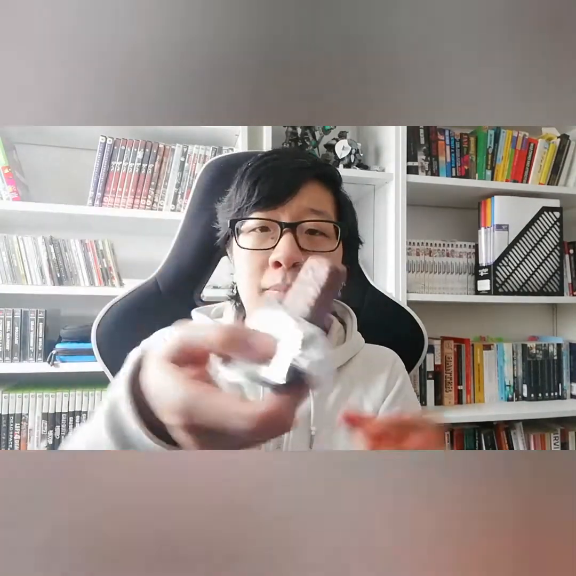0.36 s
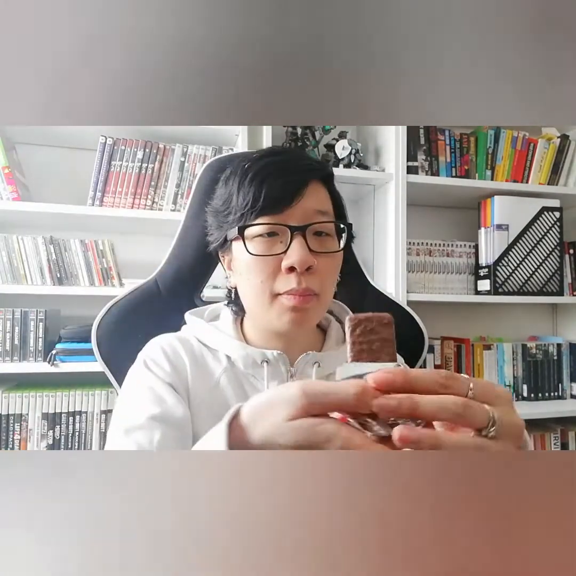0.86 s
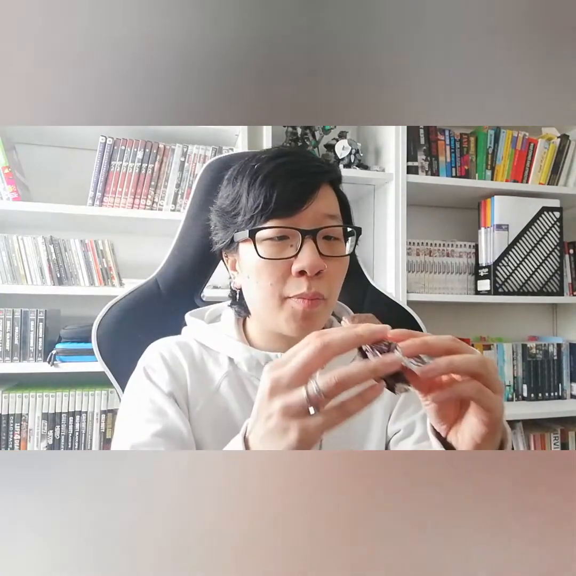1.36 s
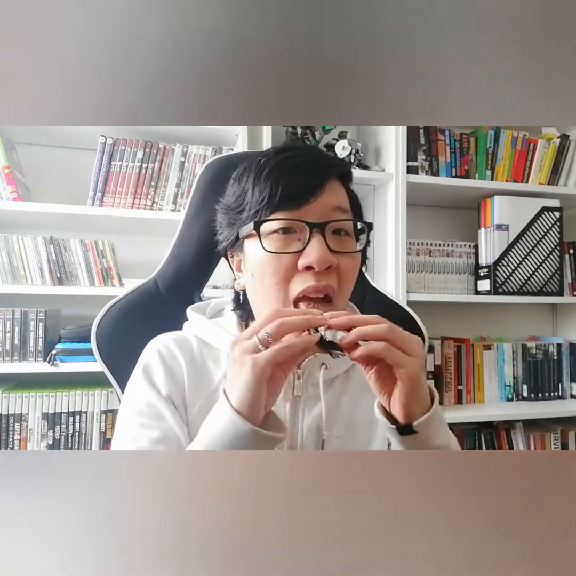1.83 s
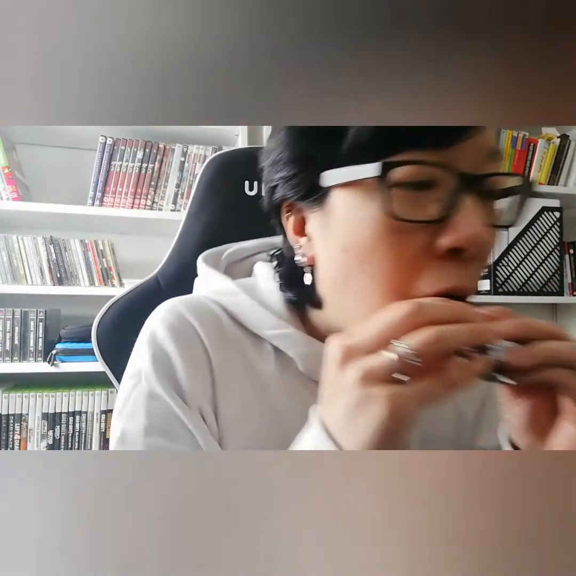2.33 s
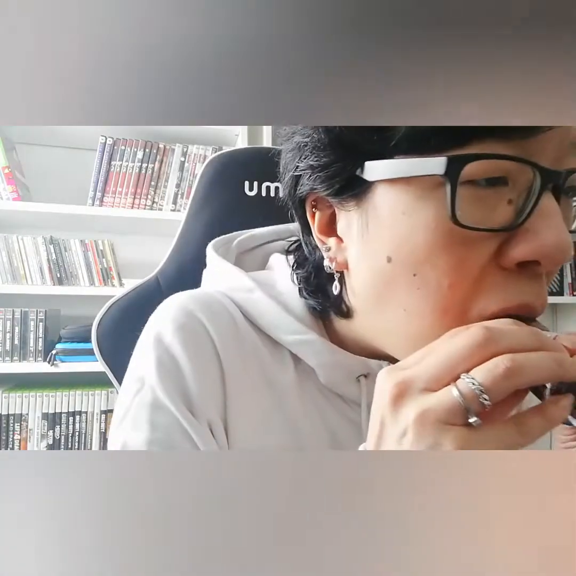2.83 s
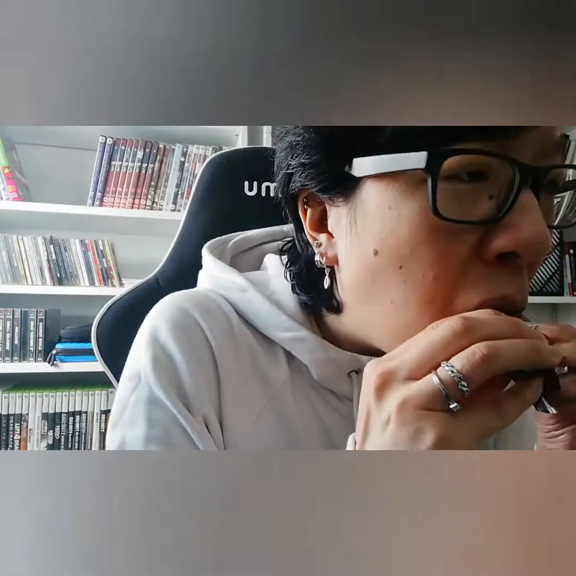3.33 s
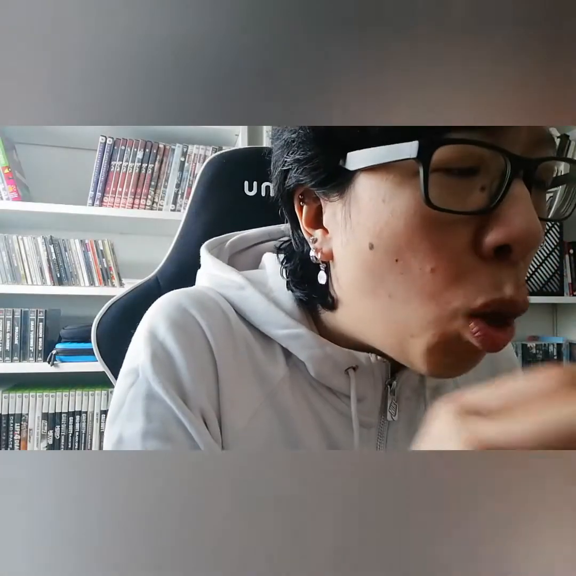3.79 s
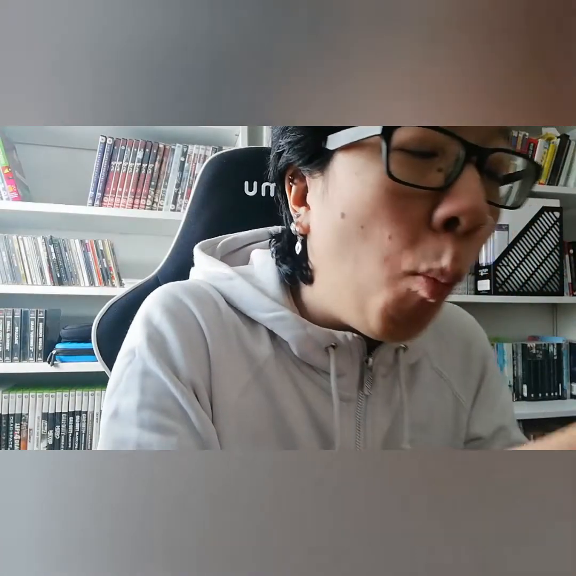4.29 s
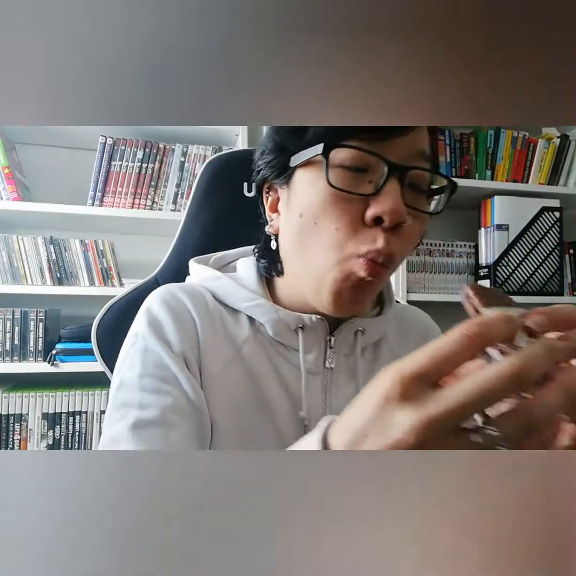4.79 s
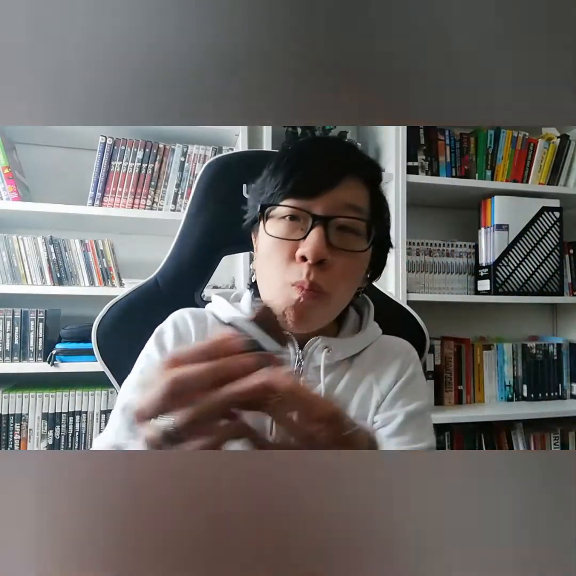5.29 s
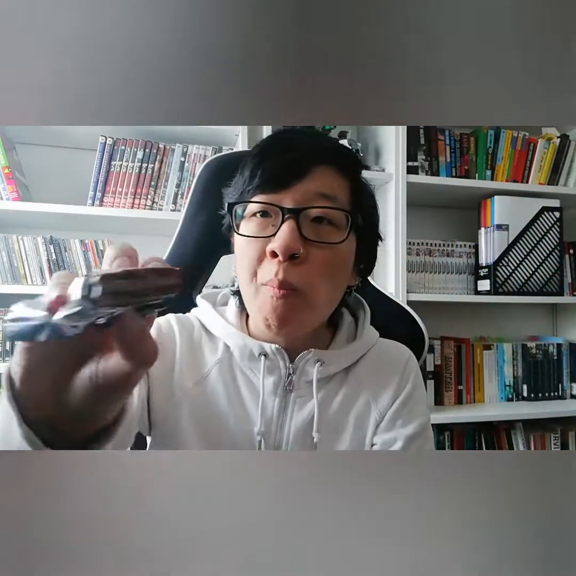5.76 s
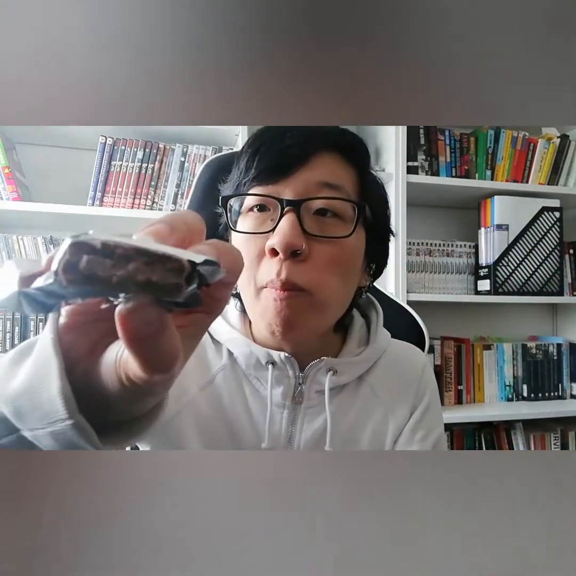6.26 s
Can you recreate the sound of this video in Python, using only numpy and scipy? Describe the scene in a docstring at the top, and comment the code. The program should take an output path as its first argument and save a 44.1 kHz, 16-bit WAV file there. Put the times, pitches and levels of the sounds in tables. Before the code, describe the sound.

Crisp, dry film crackles very near, each crease letting go with a bright tick. The handling comes in bursts: dense at first, scattered ticks next, then a single biscuit crunch with a low knock, a tangle of crinkles, a brief lull and another strong flurry. Hands rub softly and fingers tap dully. A quiet room with short reflections, faint hiss, deep drone and hum surrounds it.

```python
"""Biscuit wrapper handled in a small room

A thin plastic wrapper is handled close to a pair of spaced microphones: creases buckle in sharp snaps
over a finer crackle, each a burst of noise shaped by resonances. A bite drives damped modes with blows,
and fingers tap as decaying tones. Hands and sleeves rustle low down as shaped noise; a faint background
of noise and a hum lies beneath, and echoes with a diffuse tail place the near sounds in a furnished room.
"""
import sys
import numpy as np
from scipy import signal
from scipy.fft import rfft, irfft, next_fast_len
from scipy.io import wavfile
from scipy.ndimage import map_coordinates

SR = 44100
rng = np.random.default_rng(int(sys.argv[2]) if len(sys.argv) > 2 else 0)


def generate_wav(sig):
    """Save sig (samples, or channels by samples) to the path in sys.argv[1] as 16-bit PCM at SR."""
    pcm = np.round(np.clip(np.atleast_2d(sig).T, -1, 1) * 32767).astype(np.int16)
    wavfile.write(sys.argv[1], SR, pcm)


def attenuation_scalar(level_db):
    """Turn a level in dB into a linear amplitude multiplier (20 dB per decade)."""
    decades = np.asarray(level_db, float) / 20
    return 10 ** decades


N = 281856


def unit(x):
    """Normalization: scale to an rms of 1."""
    return x / np.sqrt(np.mean(x ** 2) + 1e-20)


def along(points, hz):
    """Spectral interpolation: (Hz, value) points joined on a logarithmic frequency axis."""
    f, v = np.transpose(points)
    return np.interp(np.log(hz + 1), np.log(f + 1), v)


def curves(rows):
    """Linear interpolation in time: one value per sample for each column after the time."""
    s, *columns = np.transpose(rows)
    return [np.interp(np.arange(N) / SR, s, column) for column in columns]


def summed(*dbs):
    """Incoherent addition: levels in dB add as powers."""
    return 10 * np.log10(sum(attenuation_scalar(db) ** 2 for db in dbs) + 1e-20)


def wobble(rate):
    """Slow fluctuation: a smooth curve through random knots of unit deviation, rate knots a second."""
    return map_coordinates(rng.standard_normal(300), [np.arange(N) * rate / SR])


def filtered(x, response):
    """Linear filtering: multiply the spectrum by a complex response of frequency."""
    m = next_fast_len(x.shape[-1] + 8192)
    return irfft(rfft(x, m) * response(np.fft.rfftfreq(m, 1 / SR)), m)[..., :x.shape[-1]]


def resonance(hz, centre_hz, width_hz):
    """Damped mode: the causal response of one resonator, 1 at its centre."""
    return 1j * hz * width_hz / (centre_hz ** 2 - hz ** 2 + 1j * hz * width_hz + 1e-9)


def causal(spectrum, hz):
    """Minimum phase: folding the cepstrum gives a causal response of the stated (Hz, dB) colour."""
    cepstrum = irfft(np.log(attenuation_scalar(along(spectrum, hz)) + 1e-5))
    half = len(cepstrum) // 2
    cepstrum[1:half] *= 2
    cepstrum[half + 1:] = 0
    return np.exp(rfft(cepstrum))


# Likeness of diffuse sound at the two microphones.
# Each row: frequency in Hz, correlation of left and right from -1 to 1.
COHERENCE = [(60, 0.99), (100, 0.97), (180, 0.71), (310, 0.33), (550, -0.93), (950, 0.15), (1650, -0.062),
             (2860, 0.067), (4970, -0.1), (8640, -0.066), (15000, 0.32)]


def diffuse(pair):
    """Spatial coherence: spaced microphones share much of the bass and little of the treble."""
    def turn(hz):
        return np.arcsin(np.clip(along(COHERENCE, hz), -1, 1)) / 2
    own = filtered(pair, lambda hz: np.cos(turn(hz)))
    shared = filtered(pair[::-1], lambda hz: np.sin(turn(hz)))
    return own + shared


def noise(spectrum):
    """Shaped random noise: a diffuse stereo field of rms 1 with the given (Hz, dB) spectrum."""
    return unit(diffuse(filtered(rng.standard_normal((2, N)), lambda hz: attenuation_scalar(along(spectrum, hz)))))


def noise_band(centre_hz, width_hz):
    """Narrow-band noise: a diffuse field of rms 1 passed twice through one resonance."""
    white = rng.standard_normal((2, N))
    return unit(diffuse(filtered(white, lambda hz: resonance(hz, centre_hz, width_hz) ** 2)))


def placed(x, lag, pan_db):
    """Time and level differences: the left microphone hears x lag seconds later and pan_db louder."""
    delays = lambda hz: np.exp(-1j * np.pi * lag * np.outer([1, -1], hz))
    return filtered(np.array([x, x]), delays) * attenuation_scalar(pan_db * np.array([[.5], [-.5]]))


# Spectrum of the steady hiss. Each row: frequency in Hz, relative density in dB per Hz.
HISS_SPECTRUM = [(12, -39), (20, -24.5), (91, -1), (265, -11), (351, -13.5), (416, -14), (452, -4.5),
                 (535, -5), (652, -8.5), (913, -9), (1210, -4), (1560, -4.5), (4930, -12.5), (15200, -19.5),
                 (16500, -35)]


def hiss():
    """Stationary noise: a constant level of broadband hiss."""
    return attenuation_scalar(-68.5) * noise(HISS_SPECTRUM)


UNSTEADY_DB = 1.5  # deviation of the rumble and the drone from their mean levels
# Spectrum of the house's rumble. Each row: frequency in Hz, relative density in dB per Hz.
RUMBLE_SPECTRUM = [(8.8, -33), (15, 8.5), (49, -13.5), (102, -3.5), (147, -10), (300, -12), (390, -39),
                   (660, -120)]


def rumble():
    """Modulated noise: the low rumble of the house wavers slowly in level."""
    return attenuation_scalar(-73.5 + UNSTEADY_DB * wobble(5)) * noise(RUMBLE_SPECTRUM)


# Drone through the walls. Each row: time in seconds, mean level in dB.
DRONE_LEVEL = [(0, -66), (.27, -67), (.45, -73), (1.3, -75.5), (2.2, -78), (6.39, -74.5)]


def drone():
    """Narrow-band transmission: a wavering band of noise in the deep bass comes through the walls."""
    return attenuation_scalar(curves(DRONE_LEVEL)[0] + UNSTEADY_DB * wobble(6.2)) * noise_band(42.3, 17)


# Shifts of weight on the chair.
# Each row: time of the peak in seconds, level in dB, time from the peak to 10 dB below it in seconds.
CHAIR_SHIFTS = [(.82, -69.5, 0.065), (2.452, -65.5, .2), (3.49, -73, 0.091), (4.076, -63, 0.064),
                (5.462, -73.5, 0.11)]


def chair():
    """Impulsive structural excitation: bell-shaped bursts of low noise make dull thumps."""
    t = np.arange(N) / SR
    thumps_db = [db - 10 * ((t - s) / half) ** 2 for s, db, half in CHAIR_SHIFTS]
    return attenuation_scalar(summed(*thumps_db)) * noise_band(100, 120)


# Mains hum. Each row: frequency in Hz, mean level in dB rms.
MAINS_HUM = [(100, -77.5)]


def hum():
    """Periodic tone: a mains sine wanders a little in level and phase, alike at both microphones."""
    t = np.arange(N) / SR
    out = np.zeros(N)
    for hz, db in MAINS_HUM:
        level = attenuation_scalar(db + 0.93 * wobble(9)) * np.sqrt(2)
        out += level * np.sin(2 * np.pi * hz * t + 0.42 * wobble(11))
    return out


def background():
    """Superposition: hiss, rumble, drone, chair and hum add linearly."""
    return hiss() + rumble() + drone() + chair() + hum()


# First echoes from near walls.
# Each row: earliest delay in seconds, mean level in dB relative to the energy of the diffuse tail.
WALL_ECHOES = [(.008, -8.5), (0.0103, -19.5), (0.0143, -12.5), (.02, -16.5)]
# Decay of the room. Each row: frequency in Hz, time to fall 60 dB in seconds.
ROOM_DECAY = [(300, 0.071), (1500, 0.27), (4000, 0.25), (8000, 0.15), (15000, 0.27)]


def room(x):
    """Reverberation: single echoes and a diffuse tail, with a new random pattern at regular steps."""
    step, gap = 4096, round(.0072 * SR)  # samples between new patterns, and before the tail begins
    out = np.zeros((2, N + SR))
    for start in range(0, N, step):
        hz, t, z = signal.stft(rng.standard_normal((2, SR // 3)), SR, nperseg=128)
        decay = attenuation_scalar(-60 * t / along(ROOM_DECAY, hz)[:, None])
        tail = signal.istft(z * decay, SR, nperseg=128)[1]
        tail /= np.linalg.norm(tail[0])
        for s, db in WALL_ECHOES:
            at = round(s * SR) - gap + rng.integers(0, 40, size=2)
            tail[[0, 1], at] += attenuation_scalar(db + rng.normal(0, 4.5, size=2))
        wet = signal.fftconvolve(x[:, start:start + step], tail, axes=1)
        out[:, start + gap:start + gap + wet.shape[1]] += wet
    return diffuse(out[:, :N])


# Grip of the fingers.
# Each row: time in seconds, relative level of fine crackle in dB, left over right in dB.
GRIP = [(0, -50.5, 1), (.3, -49, 2), (.6, -45.5, 1.5), (.9, -60, -4), (1.15, -80, 0), (1.28, -63.5, -3),
        (1.45, -44.5, 1), (1.8, -51, 3), (2.1, -61.5, 2.5), (2.5, -54, -5), (2.72, -66.5, 0),
        (3.1, -63, -4.5), (3.45, -67.5, -3), (3.7, -63.5, 1.5), (3.9, -47.5, -3.5), (4.2, -56, -2),
        (4.45, -56, -4.5), (4.6, -75, -2.5), (4.85, -53, 0), (5.1, -54.5, -3), (5.6, -59, 2.5),
        (5.9, -48.5, 2), (6.05, -70, 2.5), (6.39, -64.5, -3)]
# Squeezes of the film and the crunch of the bite: bursts of crackle, panels and rustle.
# Each row: time of the peak in seconds, relative levels of crackle, panels and rustle in dB,
# time to fade by 60 dB in seconds.
HANDLING_BURSTS = [(0.0, -60, -53, -84, 0.25), (0.438, -50, -67, -77.5, 0.12),
                   (0.639, -63, -47.5, -64, 0.144), (0.759, -61, -48, -77, .3), (.82, -60, -42, -59.5, .5),
                   (.96, -28, -36.5, -63.5, 0.62), (1.068, -45, -38.5, -53.5, 0.29),
                   (1.369, -35.5, -44.5, -62.5, 0.27), (1.548, -45, -67, -87, 0.31),
                   (1.65, -58, -65, -65, 0.54), (1.76, -42, -49, -75, 0.58), (2.22, -70, -58, -68, 1.4),
                   (2.479, -43, -59, -68, 0.3), (3.506, -26, -74, -49.5, 0.28), (3.91, -50, -47, -63, 0.28),
                   (3.99, -38, -49, -65, 0.45), (4.07, -47, -48, -55.5, 0.38),
                   (4.469, -58, -49.5, -67, 0.19), (4.819, -46, -70, -72, 0.26),
                   (4.961, -44, -53.5, -70.5, 1.2), (5.199, -55, -68, -58, 0.16),
                   (5.29, -32, -37.5, -63.5, .3), (5.428, -37, -38, -64, 0.19),
                   (5.501, -60, -49, -57.5, 0.34), (5.64, -45, -65, -77, .4), (6.33, -73, -51, -61.5, 1.36)]
RISE_SHARE = 0.28  # a burst rises in this share of the time it takes to fade
PANEL_DB = -5  # steady panels relative to steady crackle
RUB_DB, RUB_GROWS = -78, .25  # steady rustle at a grip of -51 dB, and its dB per dB of grip


def handling():
    """Common control: grip and bursts set crackle, panels and rustle; bursts rise fast, fade slowly."""
    grip_db, pan_db = curves(GRIP)
    t = np.arange(N) / SR
    power = np.zeros((3, N))
    for s, *dbs, t60 in HANDLING_BURSTS:
        fade = np.where(t < s, (s - t) / (RISE_SHARE * t60), (t - s) / t60)
        power += np.outer(attenuation_scalar(dbs), attenuation_scalar(-60 * fade)) ** 2
    steady = attenuation_scalar([grip_db, grip_db + PANEL_DB, RUB_DB + RUB_GROWS * (grip_db + 51)]) ** 2
    crackle_db, panel_db, rub_db = 10 * np.log10(power + steady)
    return crackle_db, panel_db, rub_db, pan_db


# Spectrum of hands on cloth. Each row: frequency in Hz, relative density in dB per Hz.
RUSTLE_SPECTRUM = [(41, -1), (70, -11), (96, -7.5), (150, -20.5), (330, 1.5), (606, -5.5), (700, -13),
                   (910, -5), (1540, -120)]


def rustle(rub_db):
    """Friction noise: soft low rubbing of hands and cloth, in irregular lumps."""
    return attenuation_scalar(rub_db + 2.7 * wobble(40)) * noise(RUSTLE_SPECTRUM)


# Soft finger taps.
# Each row: start in seconds, relative level in dB, frequency in Hz, time to fall 60 dB in seconds.
FINGER_TAPS = [(0.638, -55.5, 202, 0.041), (0.797, -42.5, 1115, 0.018), (1.37, -50, 377, 0.045),
               (1.666, -58, 1100, 0.063), (2.382, -41.5, 950, 0.023), (3.897, -53.5, 513, 0.21),
               (3.984, -41.5, 654, 0.041), (4.029, -49, 438, 0.072), (4.966, -44, 1076, 0.017),
               (5.19, -45, 995, 0.021), (5.423, -52.5, 331, 0.13), (5.535, -58, 320, 0.037),
               (5.775, -60.5, 290, 0.048), (6.289, -57, 272, 0.056)]


def taps():
    """Damped free vibration: fingers meet the biscuit and each other, each a dull decaying tone."""
    out, t = np.zeros(N + SR), np.arange(SR // 8) / SR
    for s, db, hz, t60 in FINGER_TAPS:
        onset = 1 - np.exp(-t / 0.0013)
        tone = attenuation_scalar(db + 6 - 60 * t / t60) * onset * np.sin(2 * np.pi * hz * t)
        out[round(s * SR):][:len(t)] += tone
    return out[:N]


# Teeth through the biscuit. Each row: time in seconds, relative level of the blow in dB.
BITE_BLOWS = [(3.488, -27), (3.495, -37.5)]
# Low resonances of biscuit and jaw. Each row: centre in Hz, width in Hz, relative level in dB.
BISCUIT_MODES = [(275, 150, 4), (640, 10, -8), (854, 11, -0.5)]


def bite():
    """Impulse excitation: the breaking biscuit strikes the low modes of biscuit and jaw."""
    blows = np.zeros(N)
    for s, db in BITE_BLOWS:
        blows[round(s * SR)] = attenuation_scalar(db + 29.5)

    def body(hz):
        modes = [attenuation_scalar(db) * resonance(hz, centre, width) for centre, width, db in BISCUIT_MODES]
        return sum((-1) ** k * mode for k, mode in enumerate(modes))  # neighbours in opposite phase
    return filtered(blows, body)


# Colour of film and microphone. Each row: frequency in Hz, relative level in dB per Hz.
FILM_COLOUR = [(290, -61.5), (500, -47.5), (605, -11), (898, -10.5), (1500, -5), (2430, -8), (4490, -2),
               (4970, -1.5), (6960, 5.5), (8540, 1), (10800, -12.5), (15100, -35), (16500, -61.5)]


def buckles(s, db, crease_hz, body_db, body_hz, sheen_db, pan_db, life):
    """Snap-through buckling: each buckle shakes the film, heard differently at each microphone."""
    size, lead = 768, .004  # samples in a burst, and seconds from the start of a burst to its peak
    t, hz = np.arange(size) / SR, np.fft.rfftfreq(size, 1 / SR)
    # each burst swells briefly, peaks, and fades by 60 dB in life seconds
    swell = attenuation_scalar(-60 * np.where(t < lead, (lead - t) / 0.0095, (t - lead) / life))
    swell += 2 * (t >= lead) * attenuation_scalar(-60 * np.abs(t - lead) / 0.0016)  # a sharp click at the peak
    shake = rfft(rng.standard_normal((len(s), 2, size)) * swell)

    def column(v):
        return np.asarray(v)[:, None, None]

    def part(colour, level_db):  # equal energy for every buckle before its level
        return attenuation_scalar(level_db) * colour / np.linalg.norm(shake * colour, axis=2, keepdims=True)

    film = causal(FILM_COLOUR, hz)
    flick = resonance(hz, 4804, 11360) ** 2  # the whole crease flicks
    ring = resonance(hz, column(crease_hz), 0.17 * column(crease_hz))  # and rings at its own pitch
    crease = flick * (0.5 + 0.85 * ring)
    panel = resonance(hz, column(body_hz), 0.33 * column(body_hz))  # a larger panel flexes
    body = 0.34 * resonance(hz, 1654, 4770) ** 2 + 1.3 * panel
    sheen = resonance(hz, 14130, 4670) ** 3  # highest treble
    colour = part(film * crease, 0)
    colour = colour + part(film * body, column(body_db)) + part(film * sheen, column(sheen_db))
    level = attenuation_scalar(column(db) + np.outer(pan_db, [.5, -.5])[:, :, None])
    sound = irfft(shake * colour, size) * level
    first = np.round(np.maximum(s + .0006 - lead, 0) * SR).astype(int)
    where = (first[:, None] + np.arange(size)).ravel()
    return np.array([np.bincount(where, sound[:, ear].ravel(), N + size)[:N] for ear in range(2)])


def swarm(crackle_db, panel_db, pan_db):
    """Random point process: many small buckles at random times, their size following the handling."""
    when, size, pitch, tone, depth, shine, side = rng.random((3000, 7)).T
    at = (when * N).astype(int)
    small_db = crackle_db[at] - 3.15 * np.log(1 - size)  # few large, many small
    panels_db = panel_db[at] - crackle_db[at] + 8 * (tone - .5)
    crease_hz, body_hz = 4000 * 2.2 ** pitch, 800 * 5.25 ** depth
    sheen_db, side_db = 8 * shine - 28, pan_db[at] + 6 * (side - .5)
    return attenuation_scalar(33) * buckles(at / SR, small_db, crease_hz, panels_db, body_hz, sheen_db, side_db, life=0.058)


# Creases that buckle.
# Each row: time in seconds, relative level in dB, crease pitch in Hz, panel level over the crease in dB,
# panel pitch in Hz.
CREASE_SNAPS = [(0.0087, -36, 7900, -23, 1520), (0.016, -39.4, 4430, -20, 1380),
                (0.1234, -41, 9730, -15, 1280), (0.1318, -27.5, 9990, -21, 2970),
                (0.1447, -37, 6720, -11, 1420), (0.1621, -29.5, 9000, -13, 2970),
                (0.2267, -48.5, 6800, 2, 1890), (0.3549, -31, 8160, -8, 1420),
                (0.368, -34, 6930, -18, 1980), (0.384, -38.8, 3100, -15, 1080),
                (0.4028, -27, 7700, -18, 2890), (0.4116, -25, 8140, -8.5, 1440),
                (0.429, -33.5, 4400, 0.5, 1030), (0.4447, -29, 6900, -15, 780),
                (0.4608, -19, 5740, -43, 2610), (0.5391, -36.5, 4740, -25, 2670),
                (0.5973, -36, 8000, -9.5, 1640), (0.638, -35.2, 3060, -17, 2750),
                (0.6932, -35, 5300, -23, 2540), (0.7147, -39, 6800, -15, 2450),
                (0.7419, -34, 8240, -4, 1550), (0.7505, -32.5, 6800, -26, 2460),
                (0.7982, -39, 5990, 7, 1290), (0.8197, -30, 6550, -7, 695), (0.8467, -31, 8440, -23, 2710),
                (0.8609, -26.5, 9560, -10, 1600), (0.8697, -24.5, 6680, -20, 730),
                (0.8903, -26.5, 8100, -6, 840), (0.8967, -27.5, 4940, -24, 2710),
                (0.9256, -28.8, 9130, -8, 2670), (0.9399, -23, 4700, -23, 2840),
                (0.9566, -30, 9260, -16, 2240), (0.9768, -23, 5050, -14, 2170),
                (1.0057, -17.5, 4820, -41, 2760), (1.0215, -23.5, 8960, -14, 990),
                (1.0427, -27.5, 5170, -8, 1850), (1.0649, -28.5, 7970, -4.5, 1040),
                (1.0739, -32, 6500, -6, 860), (1.112, -26.5, 6500, -13, 690),
                (1.1197, -23.5, 7840, -14, 820), (1.142, -30, 7900, -23, 1080),
                (1.193, -26.5, 3500, -3, 900), (1.2298, -29.5, 6600, -7, 2040),
                (1.2567, -40, 3100, 3, 2050), (1.3343, -47, 7300, -16, 950), (1.3585, -41.5, 8010, -9, 860),
                (1.3741, -33.5, 9860, -5, 694), (1.4405, -41, 8000, -19, 1680),
                (1.4463, -39, 4870, -15, 2970), (1.4585, -14, 7540, -55, 2410),
                (1.5069, -27, 9400, -22, 2450), (1.5204, -28, 4650, -9, 2600),
                (1.592, -33, 7110, -13, 1250), (1.6076, -14, 7000, -21, 1180),
                (1.6716, -46, 3270, 8.5, 1550), (1.7282, -21, 9600, -3.5, 2310),
                (1.7562, -33, 4770, 2, 1940), (1.8022, -22, 10400, -12.5, 1890),
                (1.8786, -18.5, 8910, -23, 1540), (1.8919, -23, 7240, -13, 1850),
                (1.9241, -31.3, 6500, -10, 2800), (2.0193, -41, 6300, -6, 1810),
                (2.1055, -24, 3420, -31, 2770), (2.2274, -24, 3450, -22, 2030),
                (2.2421, -19.5, 4500, -34, 2430), (2.2524, -30.5, 6400, -6, 2540),
                (2.2723, -31.9, 4470, -16, 1720), (2.3105, -29, 9860, -36, 2280),
                (2.3227, -31, 9450, -34, 2280), (2.3362, -25.0, 7490, -22, 2400),
                (2.375, -29.5, 11000, -15, 2240), (2.3856, -29, 6200, -12.5, 950),
                (2.4768, -28, 7000, -11, 2270), (2.5756, -36, 3800, -13, 1210),
                (2.5813, -41, 8570, -16, 1770), (2.607, -44.7, 4740, -12, 690),
                (2.6147, -33.9, 7150, -35, 1770), (2.647, -37, 7950, -33, 2970),
                (2.6575, -40.5, 5800, -20, 2200), (2.754, -25.5, 9800, -33, 2280),
                (2.806, -31, 6450, -23, 2970), (2.8287, -32, 5540, -29, 2140),
                (2.9037, -33.5, 7900, -25, 2930), (2.9329, -35.5, 7700, -9, 2230),
                (2.9448, -40, 3630, -28, 2020), (2.9586, -38, 4570, -25, 2280),
                (3.0962, -48.5, 5130, -17, 1160), (3.255, -49.5, 7100, -16, 900),
                (3.355, -32.5, 3160, -4.5, 2330), (3.488, -24.5, 8660, -1, 850),
                (3.5046, -23, 6000, 4.5, 2140), (3.514, -24.5, 7750, -7, 2054),
                (3.5909, -38, 7750, -17, 2800), (3.6182, -23, 6200, -18, 2080),
                (3.639, -38, 8200, -14, 1980), (3.702, -42.5, 8230, -18, 690),
                (3.723, -43.5, 6500, -19, 780), (3.7406, -47, 10250, -25, 2890),
                (3.7761, -32, 8310, -39, 2970), (3.784, -35.5, 5940, -34, 2500),
                (3.8054, -30.5, 9260, -26, 1940), (3.8166, -28.5, 7450, -31, 2240),
                (3.8255, -23.5, 7710, -36, 2220), (3.8457, -26, 7960, -42, 2070),
                (3.878, -25.5, 3920, -19, 3050), (3.8821, -26.5, 9300, -4, 2210),
                (3.9, -33, 4310, -3, 2110), (3.9244, -29, 6800, -3, 3000), (3.9488, -26.7, 6980, -23, 3030),
                (3.9842, -21, 10600, -10, 2500), (4.019, -31.5, 4440, -5, 2500),
                (4.0506, -34, 4950, -12, 1810), (4.077, -28.5, 3800, -26, 2450),
                (4.109, -24, 4780, -31, 2970), (4.1307, -26.5, 5450, -12.5, 820),
                (4.147, -34, 3080, 2.5, 2900), (4.1752, -28.5, 3450, -31, 3000),
                (4.218, -46, 3030, 2, 2820), (4.2664, -46, 3160, -7, 900), (4.2816, -39.5, 3500, -12, 3000),
                (4.3139, -38.5, 6860, -23, 1210), (4.3493, -49, 6680, -8, 1340),
                (4.3798, -29, 4220, -13, 1160), (4.399, -31.5, 3130, -14, 3000),
                (4.43, -37, 5400, -19, 2970), (4.4368, -32, 5260, -25, 2890),
                (4.4475, -28, 6750, -11.5, 1810), (4.4607, -34, 8870, -4, 2890),
                (4.4942, -49, 3060, 2, 3000), (4.569, -36, 6840, -12.5, 950),
                (4.8024, -32.5, 7500, -30, 1890), (4.8964, -39.5, 4300, 0.5, 3020),
                (4.9205, -43, 8900, -20, 2580), (4.9297, -45, 9730, -22, 2970),
                (4.9344, -28, 8400, -36, 2840), (4.9753, -40, 6500, 2, 1080), (5.002, -23, 8230, -25, 2670),
                (5.0314, -27.5, 7900, -23, 1630), (5.0853, -40, 5250, -19, 2450),
                (5.0991, -36, 6200, -21, 2800), (5.107, -21, 7130, -11, 1000),
                (5.1499, -26.5, 6630, -13, 1580), (5.1633, -21.5, 7580, -25, 2970),
                (5.1854, -21, 6800, -33, 2330), (5.1984, -13, 5940, -30, 1970),
                (5.2514, -32.8, 7800, -17, 900), (5.259, -41, 3490, 3, 2630),
                (5.2769, -16.5, 3150, -11, 1460), (5.3141, -29, 4600, -19, 2580),
                (5.3447, -28.5, 10420, -11, 690), (5.3595, -32, 3380, -1.5, 1830),
                (5.4128, -23.5, 5300, -4.5, 1050), (5.4265, -24.5, 8340, -11, 780),
                (5.454, -35, 6640, -11, 860), (5.4706, -30.4, 7050, -12, 2970),
                (5.5098, -33.5, 7060, -2.5, 840), (5.528, -40.5, 3700, 0, 835),
                (5.5385, -16.5, 6930, -15, 1890), (5.568, -34, 7700, 0.5, 1750),
                (5.5747, -28.5, 5440, -5.5, 1570), (5.6125, -40, 7110, 3, 1700),
                (5.625, -35, 7190, -13, 2200), (5.6323, -36, 7040, -18, 2760),
                (5.6445, -34, 7190, -7, 1510), (5.6484, -33.5, 6850, 0.5, 2140),
                (5.6882, -41.8, 3060, -2, 1720), (5.7045, -12.5, 6900, -18.5, 2240),
                (5.7461, -23, 8300, -34, 1350), (5.8075, -34, 3400, -18, 2890),
                (5.8218, -39, 7240, 1, 1690), (5.8373, -21.5, 5260, -27, 1640),
                (5.8975, -52, 5250, -14, 1090), (5.9414, -45.5, 7000, 5.5, 2040),
                (6.0004, -47.8, 3270, -14, 2200), (6.0676, -21.5, 7450, -21.5, 1260)]
# highest treble of a snap over its crease: mean, full width of scatter, rise with crease pitch
SHEEN_DB, SHEEN_SPREAD_DB, SHEEN_DB_PER_OCTAVE = -20, 16.5, 1


def snaps(pan_db):
    """Elastic energy release: single creases let go in loud snaps, each with its own pitches."""
    s, db, crease_hz, body_db, body_hz = np.transpose(CREASE_SNAPS)
    scatter_db = SHEEN_SPREAD_DB * (rng.random(len(s)) - .5)
    sheen_db = SHEEN_DB + scatter_db + SHEEN_DB_PER_OCTAVE * np.log2(crease_hz / 6500)
    side_db = pan_db[(s * SR).astype(int)]
    return attenuation_scalar(41.0) * buckles(s, db, crease_hz, body_db, body_hz, sheen_db, side_db, life=0.019)


# How the two microphones differ for near sound. Each row: frequency in Hz, left over right in dB.
NEAR_BALANCE = [(60, 0.0), (120, -1), (240, 1), (480, -2.5), (950, -3), (1890, 4), (3770, -1), (7520, 6),
                (15000, -2.5)]


def wrapper(crackle_db, panel_db, pan_db):
    """Superposition in the near field: snaps and swarm share one stereo coherence and balance."""
    film = diffuse(snaps(pan_db) + swarm(crackle_db, panel_db, pan_db))
    return filtered(film, lambda hz: attenuation_scalar(np.outer([.5, -.5], along(NEAR_BALANCE, hz))))


def scene():
    """Direct and reverberant fields: near sources, their room, the rustle and the background add."""
    crackle_db, panel_db, rub_db, pan_db = handling()
    near = wrapper(crackle_db, panel_db, pan_db)
    near = near + placed(bite(), lag=0.00076, pan_db=-2.5)
    near = near + placed(taps(), lag=0.00081, pan_db=-0.5)
    return near + attenuation_scalar(-7.5) * room(near) + rustle(rub_db) + background()


def low_pass(x):
    """Removes everything above the highest recorded frequency."""
    return signal.sosfilt(signal.butter(12, 16970, fs=SR, output="sos"), x)


def record(dry):
    """Signal chain: the finished stereo mix passes to the last stage."""
    return low_pass(dry)


dry = scene()
out = record(dry)
generate_wav(out)
```